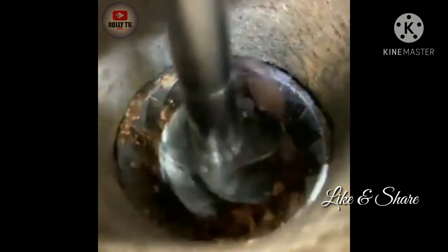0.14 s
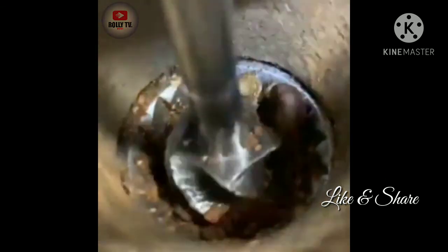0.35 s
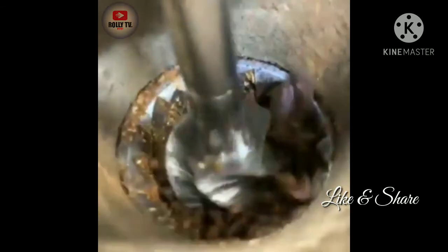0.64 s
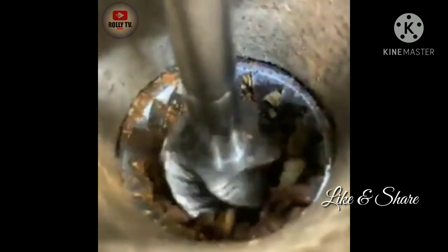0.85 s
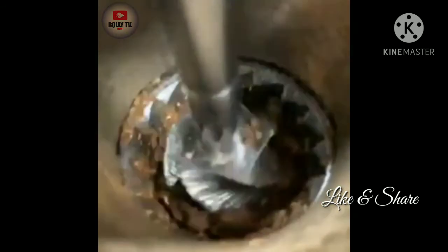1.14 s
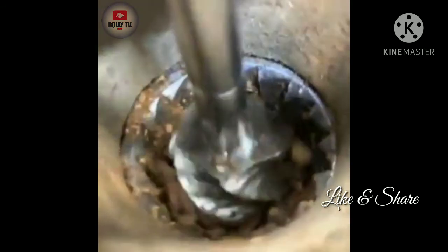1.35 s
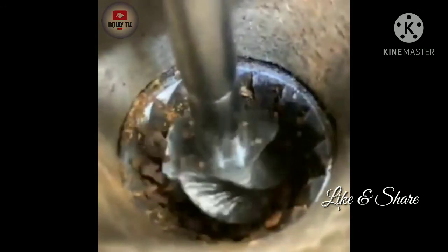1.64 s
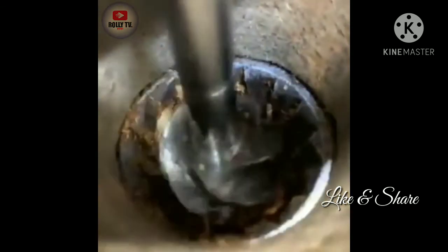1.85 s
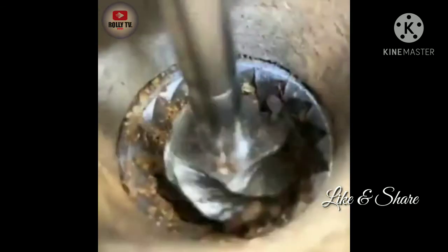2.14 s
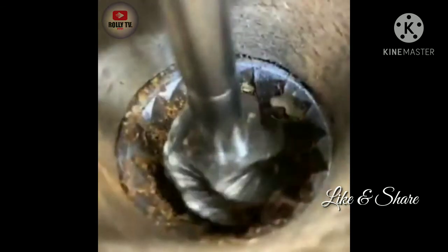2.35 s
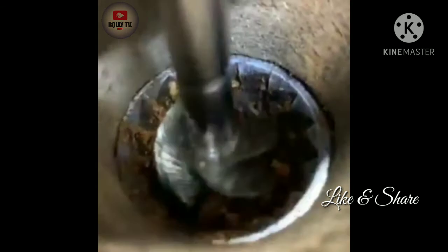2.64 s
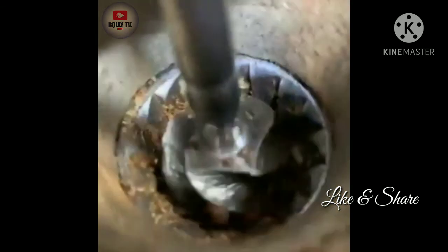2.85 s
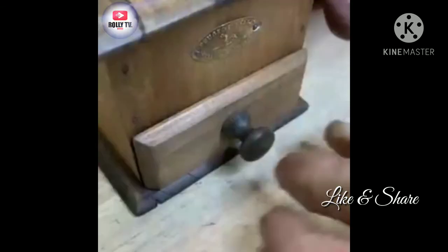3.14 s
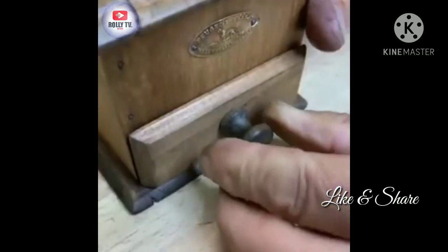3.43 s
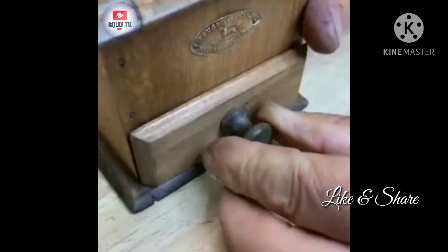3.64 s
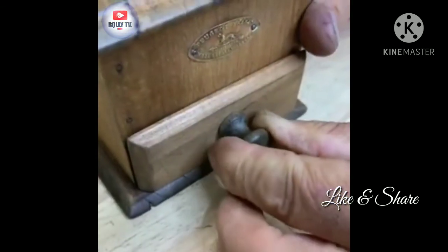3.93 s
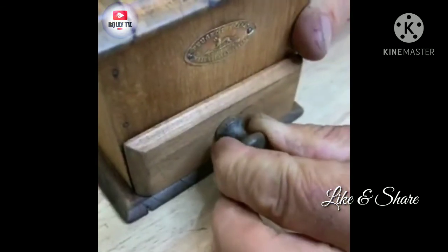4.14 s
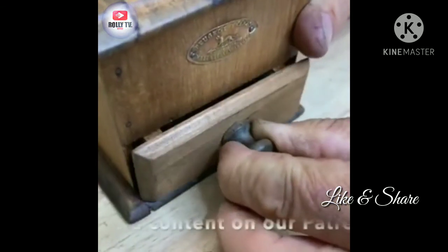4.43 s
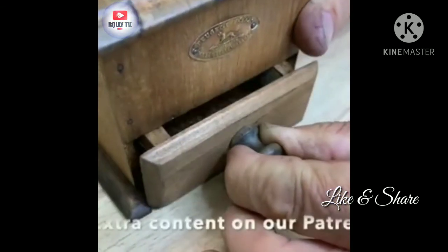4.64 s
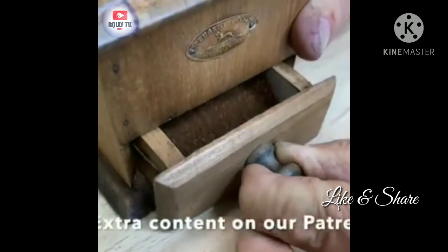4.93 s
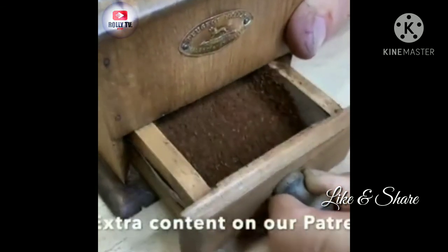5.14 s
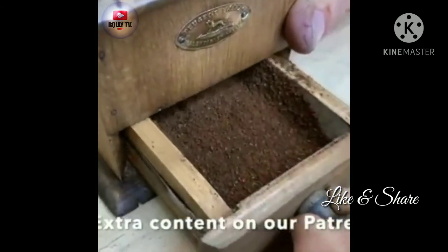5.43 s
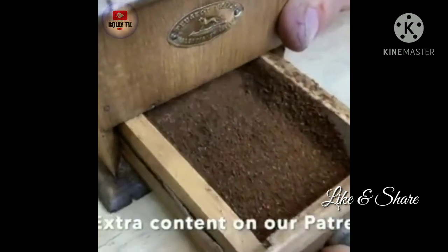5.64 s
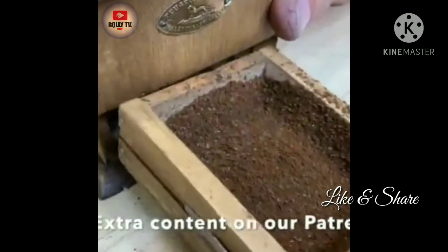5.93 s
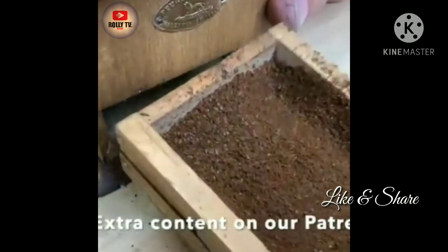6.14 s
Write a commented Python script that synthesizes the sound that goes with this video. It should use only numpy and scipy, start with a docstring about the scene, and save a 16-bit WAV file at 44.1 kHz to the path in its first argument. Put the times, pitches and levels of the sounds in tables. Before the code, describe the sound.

A close stereo microphone in a small quiet room catches about three seconds of rough, uneven bean grinding: gritty crunches, bright cracks, metallic crackle and low table rumble, with one heavy bump near the start. The grinding suddenly ends. Much softer handling follows: a small tick, dry wooden rubbing with a hiss of loose grounds, uneven sticking and slipping, and a final cluster of woody knocks.

```python
"""Coffee beans crunch and snap in a wooden hand mill close to the microphone; once the crank catches with a thump.
Then, in the quiet room, the drawer of grounds is pulled out: it ticks, scrapes along its guides, tips and knocks.
Grinding is coloured noise gated by tooth bites and tiny fractures, plus showers of damped rings.
Beans crack in noise bursts; the drawer rings damped modes and rubs in slips; the table booms at its lowest mode.
"""
import sys
import numpy as np
from scipy import signal
from scipy.fft import rfft, irfft, next_fast_len
from scipy.io import wavfile
from scipy.ndimage import uniform_filter1d

SR = 44100
rng = np.random.default_rng(int(sys.argv[2]) if len(sys.argv) > 2 else 0)


def wav_out(sig):
    """Save sig, one row per channel (or a flat mono array), as 16-bit PCM at SR to the path in sys.argv[1]."""
    wavfile.write(sys.argv[1], SR, np.round(np.clip(np.atleast_2d(sig).T, -1, 1) * 32767).astype(np.int16))


N = 276948
TIME = np.arange(N) / SR
SIZE = 2 * next_fast_len(N // 2 + SR // 4)
HZ = np.fft.rfftfreq(SIZE, 1 / SR)
GRIND_END_S = 3.064

# colour of the mill's wooden box: freq_hz, relative_db
BOX = [(32, -43.5), (55, -6.5), (118, 0), (156, 3.5), (452, 3.5), (553, 5), (605, -7.5), (800, 3.5),
       (1040, -35), (1760, -120)]
# colour of crushed beans: freq_hz, relative_db
CRUSH = [(350, -32.5), (600, -4.5), (801, -5), (992, -0.5), (1120, 0), (1240, 0.5), (1440, 0.5), (1660, 5),
         (2000, -3), (2350, -10), (2850, -8), (3600, -2.5), (4090, -16.5), (4400, -9), (5590, -39),
         (9460, -120)]
# modes of the drawer and its box: freq_hz, relative_db, t60_s
DRAWER_MODES = [(459, -19, 0.18), (616, -8.5, 0.043), (791, -9.5, 0.039), (983, -10, 0.032),
                (1202, -12, 0.042), (1504, -2, 0.022), (1755, -10.5, 0.03), (1940, -12.5, 0.032),
                (2130, -6.5, 0.023), (2403, 2, 0.035), (2810, -4, 0.023), (3460, -17, 0.03),
                (3730, -23, 0.087), (4000, -7, 0.018), (4500, -17, 0.014), (6150, -17, 0.017)]


def mill():
    """Each tooth bite crunches and shakes the box; crumbs burst; splinters crackle and ring the steel."""
    # colour of the fine crackle: freq_hz, relative_db
    crackle_colour = [(2470, -50), (4200, -21.5), (4700, -7.5), (5600, -11), (6300, -5), (7100, -14),
                      (8500, -6), (10100, -10), (11100, -5.5), (11700, -8), (12500, -3.5), (13900, 0),
                      (14900, -10.5), (16000, -9)]
    # resonances of the steel burr and hopper: freq_hz, relative_db
    steel_modes = [(4850, -6), (6330, -5), (7700, -7), (9120, -4), (11130, -3.5), (12450, -3.5), (13700, 2),
                   (15190, -2)]
    crumb_db, crumb_hz = -6, 1793  # level against the crushing
    steel_db = -7  # against the crackle

    box_db, crush_db, crackle_db = effort()
    bites = jerks(gap_s=(0.012, 0.034), count=300, spread_db=8, t60=0.022)
    coarse = grains(count=6000, spread_db=1.3, t60=0.011)
    splinters = grains(count=16000, spread_db=2, t60=0.004)
    crumbs = pings([crumb_hz], [0], scatter=0.45, t60=0.011, count=1300, spread_db=13)
    steel = pings(*np.transpose(steel_modes), scatter=0.022, t60=0.029, count=2400, spread_db=14)

    box = amp(box_db + 1.5) * np.hypot(0.37 * bites, 0.73 * coarse) * noise()
    crunching = np.hypot(0.5 * bites, 0.63 * coarse) * noise()
    crush = amp(crush_db) * (crunching + amp(crumb_db) * crumbs / 3)
    crackle = amp(crackle_db) * np.hypot(0.19 * bites, 0.67 * splinters) * noise()
    ground = filtered(box, colour(BOX)) + filtered(crush, colour(CRUSH))
    return ground + filtered(crackle, colour(crackle_colour)) + amp(crackle_db + steel_db) * steel


def effort():
    """Box, crush and crackle levels (dB): up with each stroke, down while the crank or burr is held."""
    # about two hand strokes a turn, relative levels: peak_s, length_s, crush_db, box_db, crackle_db
    strokes = [(0.01, 0.11, -26, -34.5, -27), (0.494, 0.062, -26.5, -59.5, -21.5),
               (0.937, 0.19, -28.5, -33.5, -24.5), (1.377, 0.22, -30, -39.5, -32.5),
               (1.642, 0.28, -30, -35.5, -27.5), (2.179, 0.17, -26, -54, -25), (2.485, 0.28, -28, -34, -31),
               (2.978, 0.19, -26, -35.5, -26.5)]
    # a whole bean holds the burr until it gives way: release_s, length_s, crackle_drop_db
    holds = [(0.444, 0.013, -10.5), (0.704, 0.015, -16.5), (1.053, 0.027, -3), (1.26, 0.03, -2.5),
             (1.479, 0.034, -10.5), (1.886, 0.029, -5), (1.937, 0.034, -4.5), (2.378, 0.011, -4),
             (2.437, 0.03, -5), (2.624, 0.024, -5.5), (2.786, 0.035, -7.5)]
    # relative level between strokes: crush_db, box_db, crackle_db
    idle_levels = (-31, -41, -28.5)
    # level change while the crank is caught: crush_db, box_db, crackle_db
    stall_levels = (-13.5, -12, -8.5)
    stall_start_s, stall_end_s, slow_s, resume_s = 0.282, 0.53, 0.011, 0.12
    hold_ease_s, hold_crush_share = 0.008, 0.52  # share of the drop that the crushing takes

    s, length, *peaks = np.transpose(strokes)[..., None]
    swell = np.exp(-(2 * (TIME - s) / length) ** 2)
    slowing = (TIME - stall_start_s) / slow_s
    resuming = (stall_end_s - TIME) / resume_s
    caught = np.clip(np.minimum(slowing, resuming), 0, 1)
    held_db = np.zeros(N)
    for release, span, drop_db in holds:
        held_db += drop_db * np.clip((TIME - release + span) / hold_ease_s, 0, 1) * (TIME < release)
    levels = []
    for peak, idle, stall in zip(peaks, idle_levels, stall_levels):
        power = amp(idle) ** 2 + (amp(peak) ** 2 * swell).sum(0)
        levels.append(10 * np.log10(power) + stall * caught)
    crush, box, crackle = levels
    return box, crush + hold_crush_share * held_db, crackle + held_db


def snaps():
    """Whole beans crunch and crack, each at its own brightness; large pieces only crunch dully."""
    # colour of a cracking bean: freq_hz, relative_db
    shell = [(1500, -35), (2800, -6), (4200, -7.5), (6200, -4.5), (7500, -6.5), (11000, 0), (14000, 2.5),
             (16000, -0.5)]
    # large pieces collapse between the teeth: start_s, relative_db
    crunches = [(0.034, -18), (0.37, -26), (0.405, -27), (0.616, -21), (0.673, -12.5), (0.69, -18.5),
                (0.742, -16.5), (0.764, -15), (0.89, -17), (0.933, -19), (0.969, -21), (0.99, -17.5),
                (1.108, -17), (1.28, -17), (1.408, -17), (1.569, -17), (1.6, -13), (1.679, -9),
                (1.848, -11.5), (1.9, -15.5), (2.113, -16), (2.177, -10), (2.206, -18), (2.265, -19),
                (2.36, -15), (2.53, -20), (2.661, -11.5), (2.918, -15), (2.987, -18)]

    s, db, crunch_db = np.transpose(cracks())
    bright_db = rng.normal(0, 1.1, len(s))
    piece_s, piece_db = np.transpose(crunches)
    pieces = bursts(piece_s, piece_db - 6, t60=0.014, attack=0.000518)
    beans = bursts(s, db + crunch_db - 6, t60=0.019, attack=0.00021)
    crunch = filtered(np.hypot(pieces, beans) * mottled(noise(), depth_db=4), colour(CRUSH))
    # each crack is tilted at random towards the upper or the lower treble
    upper = 1 / (1 + (7000 / (HZ + 1)) ** 6)
    dull = bursts(s, db - 5 - bright_db, t60=0.014, attack=0.0012) * noise()
    sharp = bursts(s, db - 5 + bright_db, t60=0.014, attack=0.0012) * noise()
    dull = filtered(dull, colour(shell) * np.sqrt(1 - upper))
    return crunch + dull + filtered(sharp, colour(shell) * np.sqrt(upper))


def cracks():
    """Rows (start_s, relative_db, crunch_db): a bean breaks in two cracks, a chip in one sharp tick."""
    # whole beans: start_s, relative_db, crunch_db (against the crack), second_crack_delay_s
    whole_beans = [(0.021, -13.5, -8, 0.011), (0.258, -11.5, -20, 0.0022), (0.427, -13, -1, 0.015),
                   (0.5204, -14, -2, 0.0021), (0.7045, -12.5, -11.5, 0.0056), (0.965, -14, -13.5, 0.0018),
                   (1.053, -2, -13.5, 0.0046), (1.2215, -14.5, -8, 0.0027), (1.482, -18, -10.5, 0.003),
                   (1.5239, -8, -9.5, 0.0038), (1.8222, -10, -8, 0.002), (1.9436, -7.5, 1, 0.0024),
                   (1.955, -9.5, -27, 0.0031), (2.0709, -12, -3.5, .001), (2.083, -19, 7, 0.0013),
                   (2.136, -11, -9, 0.002), (2.379, -11.5, -3, 0.001), (2.4393, -17.5, -1, 0.004),
                   (2.508, -8, -24, 0.0016), (2.576, -12, -10, 0.0044), (2.708, -12.5, -8, 0.0023),
                   (2.7845, -7.5, -7.5, 0.015)]
    # small chips: start_s, relative_db
    chips = [(0.118, -12.5), (0.192, -7.5), (0.229, -12), (0.277, -19), (0.289, -14), (0.307, -15),
             (0.319, -13.5), (0.3472, -26), (0.3706, -32), (0.396, -21), (0.4011, -17.5), (0.406, -21),
             (0.607, -19.5), (0.8, -17.5), (0.949, -14.5), (1.293, -11), (1.498, -7), (1.509, -16),
             (1.6, -10), (1.733, -11), (1.888, -17), (1.901, -13.5), (2.0526, -24), (2.119, -17.5),
             (2.177, -10), (2.2046, -9), (2.334, -13), (2.7427, -33), (2.929, -13), (2.948, -7),
             (3.044, -26)]
    second_db = -2  # against the first crack
    chip_db, chip_crunch_db = -2, -22.5  # offset of all chips; crunch against tick

    first = [(s, db, crunch) for s, db, crunch, delay in whole_beans]
    second = [(s + delay, db + second_db, crunch) for s, db, crunch, delay in whole_beans]
    return first + second + [(s, db + chip_db, chip_crunch_db) for s, db in chips]


def bump():
    """Something thumps against the microphone and rebounds: falling swings, a short clack and rattle."""
    bump_s, rebound_s = 0.2603, 0.2872
    lead_s = 0.00027  # the thump reaches the left microphone first

    times = [bump_s, rebound_s]
    rattle = bursts(times, np.array([-22, -30]), t60=0.026, attack=0.001) * noise()
    clack = bursts(times, np.array([-21, -30]), t60=0.013, attack=0.00023) * noise()
    thump = swing(start=bump_s, db=-3.5, fall_hz=1280, t60=0.08)
    thump = thump + swing(start=rebound_s, db=-11.5, fall_hz=60, t60=0.055)
    lead = np.exp(1j * np.pi * np.outer([1, -1], HZ) * lead_s)
    return filtered(thump, lead) + filtered(rattle, colour(BOX)) + filtered(clack, colour(CRUSH))


def swing(start, db, fall_hz, t60, low_hz=68, fall_s=0.0028):
    """A heavy damped swing whose pitch drops at once, then settles slowly."""
    t = np.maximum(TIME - start, 0)
    pitch_hz = (low_hz + fall_hz / (1 + t / fall_s) ** 2) * (t > 0)
    phase = 2 * np.pi * np.cumsum(pitch_hz) / SR
    return amp(db - 60 * t / t60) * np.sin(phase) * (1 - np.exp(-t / 0.0016))


def drawer():
    """Each contact clicks, thocks and rings damped wood modes, then chatters in the guides."""
    # the drawer touches the box: start_s, relative_db, then against it wood_db, ring_db (upper modes)
    contacts = [(4.3843, -29.5, -22, -24), (4.789, -29, -5, -17), (4.85, -34, -9, -18),
                (4.916, -31, -33, -18), (4.975, -27.5, -10, -32), (5.081, -34, -7, -29),
                (5.091, -40, -9, -22), (5.168, -46, -5, -20), (5.8324, -35.5, 14, -0.5),
                (5.8484, -25.5, -9, -20), (5.855, -40, -17, -21), (6.2176, -30.5, 10, 5),
                (6.2236, -23.5, -1, -1), (6.225, -23, 3, 11), (6.229, -33.5, 13.5, -5),
                (6.261, -51, 18, 12)]
    # colour of the click: freq_hz, relative_db
    click_colour = [(200, -46), (2000, -11), (3800, -7.5), (5800, 4), (8000, 1), (11000, 1.5), (14000, -1),
                    (15500, 1)]
    # colour of the wooden thock: freq_hz, relative_db
    wood_colour = [(40, -71.5), (200, -22.5), (330, -16), (470, 10.5), (750, 12), (1050, -11), (1400, 10.5),
                   (2000, -7), (3000, 6), (4500, -29.5), (6000, -26.5), (10000, -13), (14000, -49)]
    # colour of the chatter in the guides: freq_hz, relative_db
    clatter_colour = [(100, -23), (250, -5.5), (450, 7.5), (800, -2), (1300, 3), (2000, -1.5), (2700, -6),
                      (3200, -1.5), (4000, -10.5), (5000, -16.5), (9000, -34), (14000, -48)]
    clatter_db, clatter_t60_s = -15, 0.25  # against the wood level of the contact

    s, db, wood_db, ring_db = np.transpose(contacts)
    hz, mode_db, t60 = np.transpose(DRAWER_MODES)[..., None]
    t = TIME[:SR // 4]
    knocks = np.zeros((2, N + SR))
    for start, level, low, high in zip(s, db, wood_db, ring_db):
        chance_db = rng.normal(0, 1.5, (2, len(hz), 1))
        drive_db = level + chance_db + np.interp(hz, [1950, 2250], [low + 4, high + 6])
        # the higher the mode, the more its phase differs between the microphones
        phase = rng.standard_normal((2, len(hz), 1)) * hz / 700
        modes = amp(drive_db + mode_db - 60 * t / t60) * np.sin(2 * np.pi * hz * t + phase)
        knocks[:, round(start * SR):][:, :len(t)] += modes.sum(1) * (1 - np.exp(-t / 0.00013))
    # high-pass keeps the sudden mode onsets free of a low-frequency step
    knocks = filtered(knocks[:, :N], (1j * HZ / (200 + 1j * HZ)) ** 2)
    click = bursts(s, db - 6, t60=0.029, attack=0.00079) * noise()
    thock = bursts(s, db + wood_db - 8, t60=0.035, attack=0.00076) * noise()
    clatter = bursts(s, db + wood_db + clatter_db, clatter_t60_s, attack=0.0034)
    clatter = clatter * grains(count=2000, spread_db=5, t60=0.024) * noise()
    struck = knocks + filtered(click, colour(click_colour)) + filtered(thock, colour(wood_colour))
    return struck + filtered(clatter, woody(clatter_colour))


def slide():
    """The drawer sticks and slips along its guides, shaking its wood and rubbing loose grounds."""
    # colour of the scraping wood: freq_hz, relative_db
    scrape_colour = [(80, -22.5), (150, 21), (230, 12), (650, 14.5), (1700, 10.5), (3000, 2), (6000, -12),
                     (12000, -21)]
    # colour of grounds rubbed in the guides: freq_hz, relative_db
    dust_colour = [(1500, -6), (3500, 4), (5600, 3.5), (6700, 1.5), (8000, -4.5), (9000, 4), (13000, -0.5),
                   (14600, -4), (15500, -8)]

    wood, dust = rubbing()
    slips = jerks(gap_s=(0.005, 0.03), count=420, spread_db=10, t60=0.018)
    ticks = grains(count=500, spread_db=3, t60=0.004)
    scrape = wood * np.hypot(0.8, 0.55 * slips) * noise()
    hiss = dust * np.sqrt(0.72 + 0.1 * slips ** 2 + 0.2 * ticks ** 2) * noise()
    return filtered(scrape, woody(scrape_colour)) + filtered(hiss, colour(dust_colour))


def rubbing():
    """Gains of wood and of grounds: each tug sets in, holds and dies away."""
    # fingers take the knob, then tug, relative levels: start_s, length_s, wood_db, grounds_db
    rubs = [(3.07, 0.29, -67, -72), (4.332, 0.21, -59, -63), (4.77, 0.16, -50.5, -54.5),
            (4.94, 0.13, -45.5, -51.5), (5.093, 0.065, -53, -59.5), (5.18, 0.27, -52, -61.5),
            (5.434, 0.1, -49.5, -50.5), (5.556, 0.11, -50.5, -54), (5.678, 0.067, -59, -60),
            (5.762, 0.055, -50, -55)]
    attack_s, t60_s = 0.042, 0.21

    s, length, *levels = np.transpose(rubs)[..., None]
    decay = amp(-60 * np.maximum(TIME - s - length, 0) / t60_s)
    shape = decay * np.clip((TIME - s) / attack_s, 0, 1)
    return [(amp(db) * shape).sum(0) for db in levels]


def woody(points):
    """A colour with the drawer's modes standing out of it."""
    width_hz = 91
    peaks = sum(1 / (1 + (2 * (HZ - hz) / width_hz) ** 2) for hz, db, t60 in DRAWER_MODES)
    return unit(colour(points) * (0.47 + peaks))


def table(mode_hz=124, scatter=0.035, rumble=0.55):
    """The table top booms near its lowest mode at each thud, and during grinding rumbles with it."""
    # the mill rocks on the table, once a turn and under the drawer: start_s, boom_peak_db
    thuds = [(0.158, -33), (1.042, -35.5), (1.945, -32), (2.665, -38), (2.759, -35), (4.972, -38),
             (5.483, -43.5), (5.831, -41), (6.216, -30)]
    # colour of the rumble: freq_hz, relative_db
    rumble_colour = [(25, -53.5), (50, -13.5), (80, -6.5), (110, -5), (165, -3.5), (260, -14.5), (600, -48)]
    swell_s = 0.0446  # time the boom takes to build

    boom, weight = np.zeros((2, N))
    for (s, db), detune in zip(thuds, rng.standard_normal(len(thuds))):
        t = np.maximum(TIME - s, 0)
        push = amp(db) * (t / swell_s * np.exp(1 - t / swell_s)) ** 2
        boom += push * np.sin(2 * np.pi * mode_hz * (1 + scatter * detune) * t)
        weight += push
    grinding = TIME < GRIND_END_S
    return boom + rumble * weight * grinding * filtered(noise(), colour(rumble_colour))


def air():
    """Steady coloured noise of the quiet room."""
    # colour of the room noise: freq_hz, relative_db
    air_colour = [(25, -16), (55, -11.5), (87, -0.5), (200, -5.5), (350, -3.5), (750, -8.5), (1400, -9.5),
                  (1800, -5.5), (2600, -15.5), (4100, -27), (6600, -34.5), (8500, -46.5), (14000, -47),
                  (16000, -68)]
    return amp(-46.5) * filtered(noise(), colour(air_colour))


def room(x):
    """A small room answers with a decaying noise tail; its top treble dies first."""
    # reverberation: freq_hz, t60_s
    decay_times = [(150, 0.06), (1500, 0.28), (6000, 0.13), (14000, 0.045)]
    hz, t, z = signal.stft(rng.standard_normal((2, SR // 2)), SR, nperseg=256)
    decay = amp(-60 * t / along(decay_times, hz)[:, None])
    tail = signal.istft(z * decay, SR, nperseg=256)[1]
    tail = np.pad(tail / np.linalg.norm(tail[0]), ((0, 0), (SR // 200, 0)))  # 5 ms late
    return signal.fftconvolve(x, tail, axes=1)[:, :N]


def mottled(x, depth_db):
    """The beans shift in the hopper, so narrow bands of its colour come and go."""
    z = signal.stft(x, nperseg=512)[2]
    field = uniform_filter1d(rng.standard_normal(z.shape[1:]), size=3, axis=0)
    field = uniform_filter1d(field, size=10, axis=1)
    gain = unit(amp(depth_db * unit(field)))
    return signal.istft(z * gain, nperseg=512)[1][:, :N]


def pings(hz, db, scatter, t60, count, spread_db):
    """Stereo shower of tiny damped rings, each at its own pitch near one of the given ones."""
    when, pick, size, left, right = rng.random((count, 5)).T[..., None]
    which = (pick * len(hz)).astype(int)
    pitch = np.asarray(hz)[which] * np.exp(scatter * rng.standard_normal((count, 1)))
    t = TIME[:SR // 80]
    level_db = np.asarray(db)[which] + spread_db * size ** 2
    ring = amp(level_db) * amp(-60 * t / t60) * (1 - np.exp(-t / 0.0001))
    at = ((when * GRIND_END_S * SR).astype(int) + np.arange(len(t))).ravel()
    channels = []
    for turn in (left, right):
        wave = ring * np.sin(2 * np.pi * (pitch * t + turn))
        channels.append(np.bincount(at, wave.ravel(), N))
    pair = np.array(channels)
    return pair / np.std(pair[:, TIME < GRIND_END_S])


def jerks(gap_s, count, spread_db, t60):
    """Envelope of bites or slips that follow one another, unevenly spaced and unevenly hard."""
    gap, size = rng.random((count, 2)).T
    shortest, longest = gap_s
    when = np.cumsum(shortest + gap * (longest - shortest))
    return unit(bursts(when, spread_db * size, t60, attack=0.001))


def grains(count, spread_db, t60):
    """Envelope of many tiny fractures at random moments, most weak and a few strong."""
    when, rank = rng.random((count, 2)).T
    size = np.minimum(-np.log(1 - rank), 5)
    return unit(bursts(when * N / SR, spread_db * size, t60, attack=0.00033))


def bursts(times, db, t60, attack):
    """Power-summed envelope of short bursts that rise and die away."""
    t = TIME[:SR // 2]
    shape = amp(-60 * t / t60) * (1 - np.exp(-t / attack))
    energy = np.bincount((np.asarray(times) * SR).astype(int), amp(db) ** 2, N)[:N]
    power = signal.fftconvolve(energy, (shape / shape.max()) ** 2)[:N]
    return np.sqrt(np.abs(power))


def noise():
    """White noise at two microphones: alike in the bass, nearly unrelated in the treble."""
    # left-right correlation: freq_hz, correlation
    likeness = [(60, 0.98), (270, 0.96), (450, 0.69), (750, 0.19), (3000, 0), (15000, 0.12)]
    turn = np.arccos(np.clip(along(likeness), -1, 1)) / 2
    mid, side = filtered(rng.standard_normal((2, N)), np.array([np.cos(turn), np.sin(turn)]))
    return np.array([mid + side, mid - side])


def colour(points):
    """Causal minimum-phase response with this spectrum and unit power gain."""
    cepstrum = irfft(np.log(np.maximum(unit(amp(along(points))), 1e-6)))
    # fold the cepstrum onto positive times
    cepstrum[1:SIZE // 2] *= 2
    cepstrum[SIZE // 2 + 1:] = 0
    return np.exp(rfft(cepstrum))


def filtered(x, response):
    """x through a frequency response."""
    return irfft(rfft(x, SIZE) * response, SIZE)[..., :N]


def along(points, hz=HZ):
    """(Hz, value) points interpolated on a log frequency axis."""
    f, v = np.transpose(points)
    return np.interp(np.log(hz + 1), np.log(f + 1), v)


def unit(x):
    """Scale to rms 1."""
    return x / np.sqrt(np.mean(np.abs(x) ** 2) + 1e-20)


def amp(db):
    """Decibels to gain."""
    return 10 ** (np.asarray(db) / 20)


def scene():
    """The grinding, a little to the left, is cut off by a very short fade; drawer and room noise go on."""
    # stereo balance of the mill: freq_hz, left_minus_right_db
    mill_side = [(200, 0), (400, -0.5), (750, 4.5), (1300, 4), (2400, 4.5), (4400, 1), (15000, -0.5)]
    pan = amp(np.outer([0.5, -0.5], along(mill_side)))
    beans = filtered(mottled(mill(), depth_db=3.2) + snaps(), pan)
    # very short fade of the grinding together with its reverberation
    fade = amp(-60 * np.maximum(TIME - GRIND_END_S, 0) / 0.054)
    grinding = fade * (beans + amp(-9.5) * room(beans))
    wood = drawer() + slide()
    return grinding + wood + amp(-13) * room(wood) + bump() + table() + air()


def record(dry):
    """The recorder thins the deepest bass, cuts steeply above its band limit and clips at full scale."""
    low_cut_hz, top_hz = 34, 15420
    low_cut = (1j * HZ) ** 2 / (low_cut_hz ** 2 - HZ ** 2 + 1j * np.sqrt(2) * low_cut_hz * HZ)
    band_limit = 1 / np.sqrt(1 + (HZ / top_hz) ** 160)
    return np.clip(filtered(dry, low_cut * band_limit), -1, 1)


dry = scene()
out = record(dry)
wav_out(out)
```